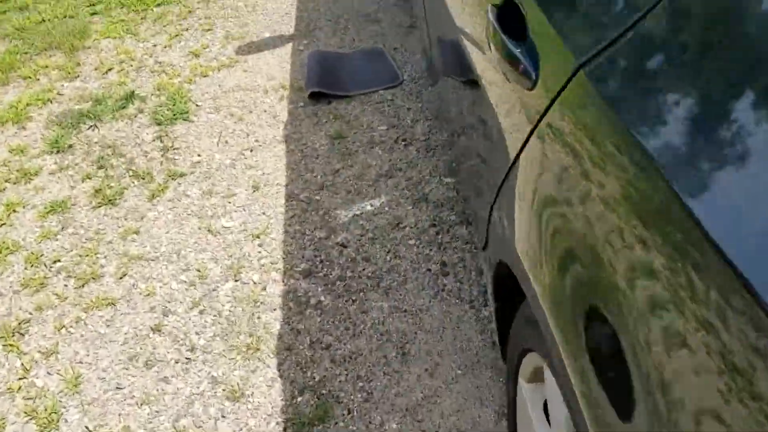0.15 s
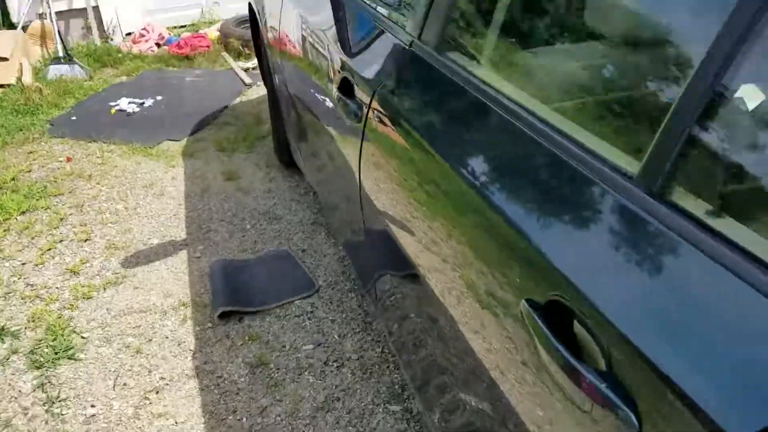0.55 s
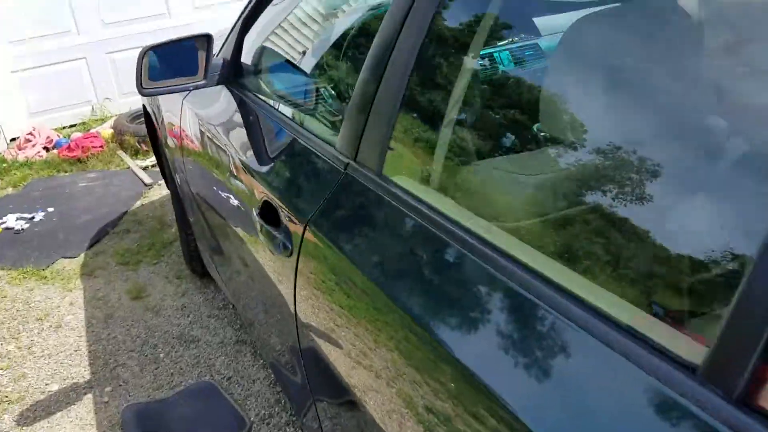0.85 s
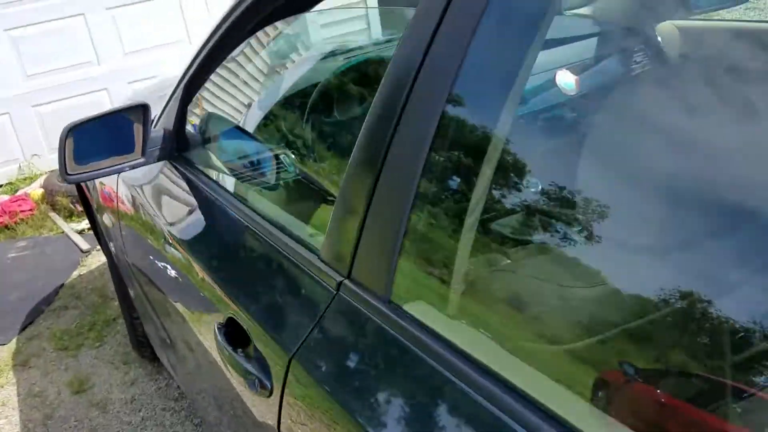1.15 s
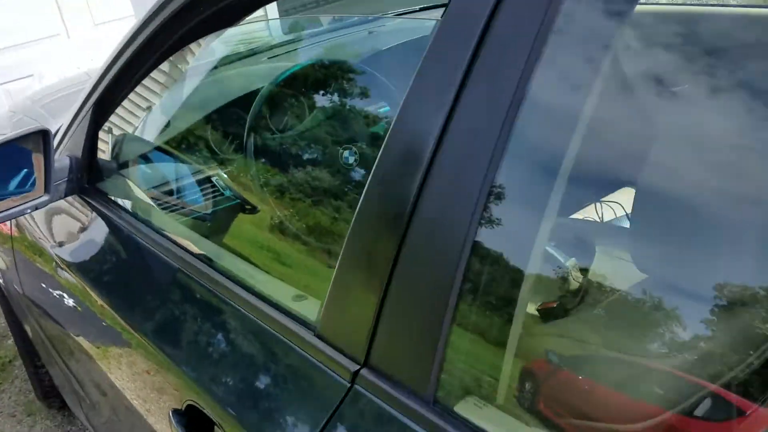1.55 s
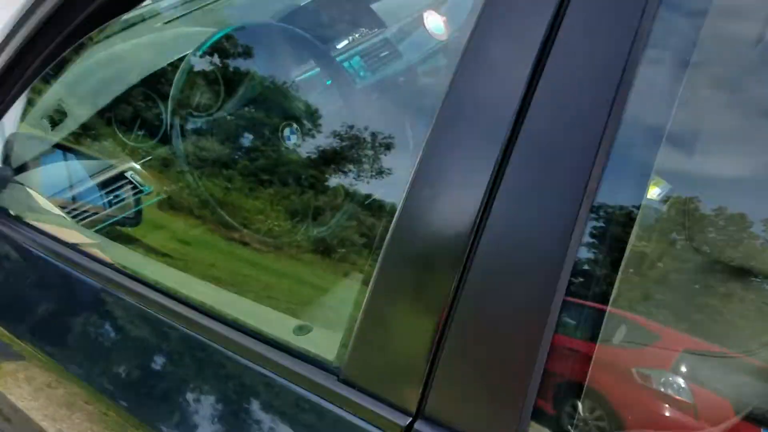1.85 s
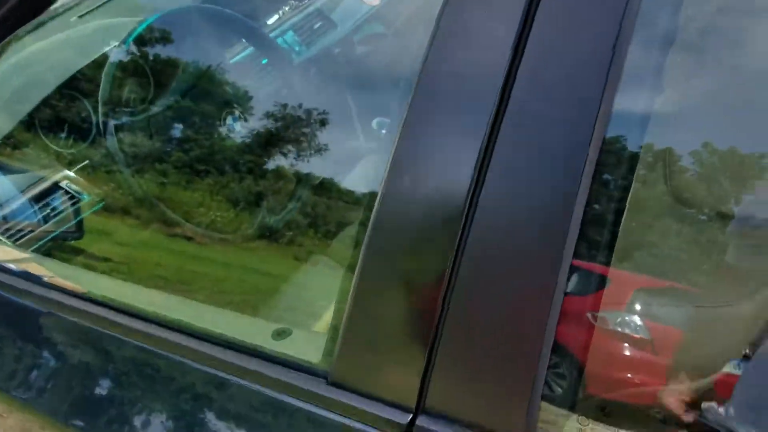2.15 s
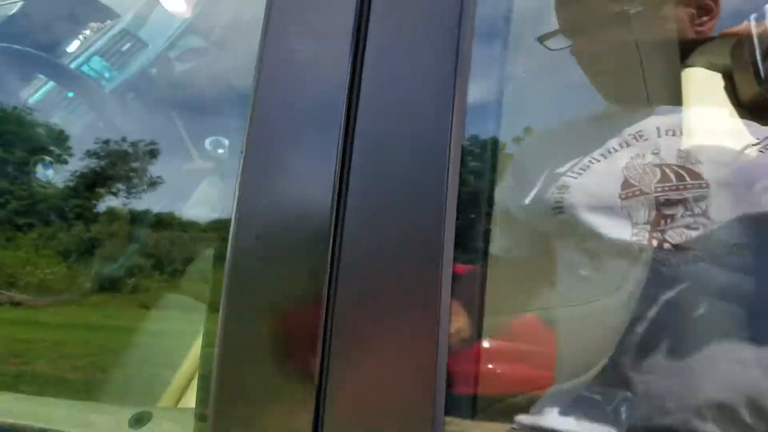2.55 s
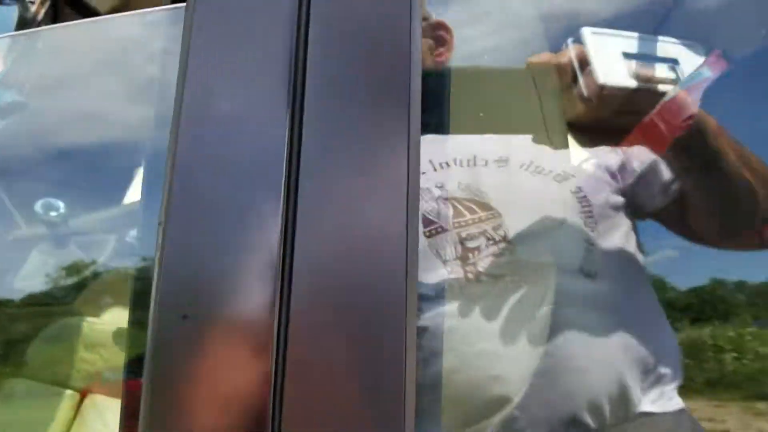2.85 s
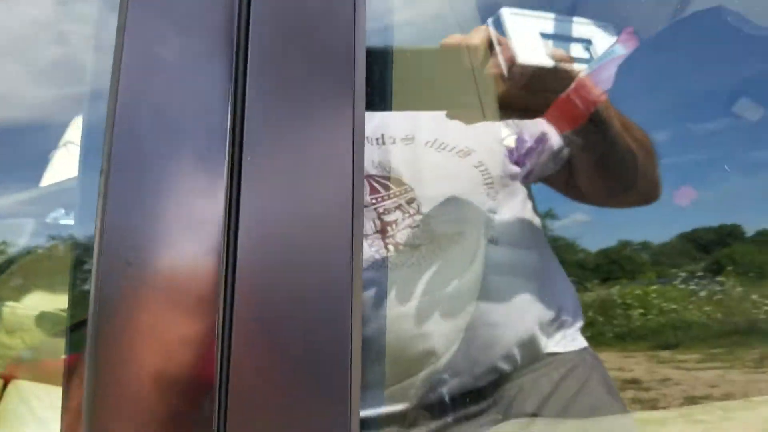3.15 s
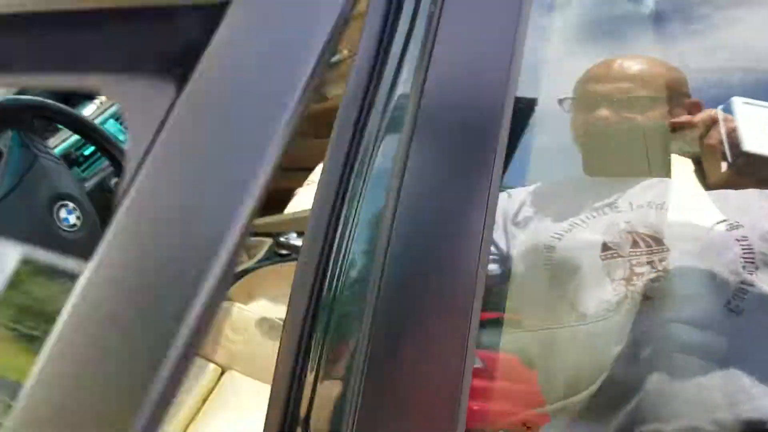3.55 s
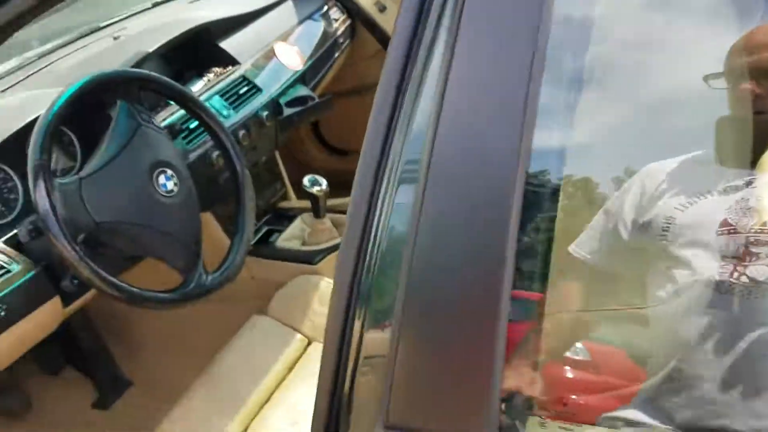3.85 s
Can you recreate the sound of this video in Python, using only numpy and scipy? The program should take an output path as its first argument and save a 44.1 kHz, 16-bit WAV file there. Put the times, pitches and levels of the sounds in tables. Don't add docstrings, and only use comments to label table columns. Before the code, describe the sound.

Shuffling footsteps crunch on loose gravel, close to a stereo handheld microphone; keys tick and jingle through the middle, while an insect trills softly and a distant engine fades early, outdoors beside a parked car.

```python
import sys
import numpy as np
from scipy import signal
from scipy.fft import rfft, irfft
from scipy.io import wavfile

SR = 44100
rng = np.random.default_rng(int(sys.argv[2]) if len(sys.argv) > 2 else 0)


def store_wav(level_fs):
    pcm = np.round(np.clip(np.atleast_2d(level_fs), -1, 1) * 32767)
    wavfile.write(sys.argv[1], SR, pcm.T.astype(np.int16))


def ratio(d):
    e = np.asarray(d, float) / 20
    return 10 ** e


N = 176400


def unit(x):
    return x / np.sqrt(np.mean(x ** 2) + 1e-20)


def at_hz(points, hz):
    points = np.array(points)
    return np.interp(np.log(hz), np.log(points[:, 0]), points[:, 1])


def shaped(x, gain):
    hz = np.maximum(np.fft.rfftfreq(N, 1 / SR), 1)
    return irfft(rfft(x) * gain(hz), N)


def drift(rate_hz):
    hop = 40
    r = np.exp(-2 * np.pi * hop * rate_hz / SR)
    slow = signal.lfilter([1], [1, -2 * r, r * r], rng.standard_normal(N // hop + 2002))[2000:]
    return np.interp(np.arange(N) / hop, np.arange(len(slow)), unit(slow))


def ring(clicks, hz, t60):
    r = ratio(-60 / (t60 * SR))
    w = 2 * np.pi * min(hz, .45 * SR) / SR
    return signal.lfilter([0, np.sin(w)], [1, -2 * r * np.cos(w), r * r], clicks + 1e-18)


def pair(x, place):
    lag, lag_spread = 5.3, 6.54
    left = np.roll(x, int(lag + lag_spread * place))
    return np.array([left, x]) * ratio([[2.0 * place], [0]])


def add(out, s, x):
    i = int(s * SR)
    out[:, i:i + x.shape[1]] += x[:, :N - i]


def bright(hz):
    # f/Hz, level/dB
    treble_colour = [(2500, -3), (4800, -14.5), (6200, -4.5), (7400, -13.5), (8700, 2.5), (10800, -6.5),
                     (13400, -5), (15500, -9)]
    return ratio(at_hz(treble_colour, hz)) * (hz > 2200)


def air():
    # f/Hz, level/dB
    air_spectrum = [(100, -4.5), (353, 2), (884, -9), (2300, -4), (3100, -13), (4800, -17), (7200, -13),
                    (16000, -24)]
    air_db, patchy_db, alike_below_hz = -49, 3, 710
    edges = [0, 700, 2800, 5000, 7500, 11000, SR]

    def floor_gain(hz):
        return ratio(at_hz(air_spectrum, hz)) * (hz > 90)

    def coherence(hz):
        return 1 / (1 + (hz / alike_below_hz) ** 2)

    mid, side = rng.standard_normal((2, N))
    mid = shaped(mid, lambda hz: floor_gain(hz) * np.sqrt(1 + coherence(hz)))
    side = shaped(side, lambda hz: floor_gain(hz) * np.sqrt(1 - coherence(hz)))
    both = unit(np.array([mid + side, mid - side]))
    shared = drift(3)
    out = np.zeros((2, N))
    for low, high in zip(edges, edges[1:]):
        swell = ratio(patchy_db * (.7 * shared + .7 * drift(14)))
        out += swell * shaped(both, lambda hz: (hz > low) & (hz <= high))
    return ratio(air_db) * out


def wind():
    # middle t/s, width/s, level/dB
    gusts = [
        (.2, 0.83, -45),
        (.6, 0.048, -49),
        (3.2, 0.084, -46),
    ]
    calm_db, wind_hz = -67, (41.6, 130)
    t = np.arange(N) / SR
    both, own = rng.standard_normal(N), rng.standard_normal((2, N))
    band = signal.butter(2, wind_hz, "band", fs=SR, output="sos")
    turbulence = unit(signal.sosfilt(band, both + 0.96 * own))
    blow = ratio(calm_db)
    for s, width, db in gusts:
        blow = blow + ratio(db) * np.exp(-.5 * ((t - s) / width) ** 2)
    return blow * ratio(1.5 * drift(15)) * turbulence


def engine():
    # f/Hz, width/Hz, level/dB
    engine_lines = [
        (113.5, 6, 0),
        (159, 5, -4),
        (200, 8, -9),
    ]
    engine_db, stop_s, rest_db = -44, 0.7, -15.5
    t = np.arange(N) / SR

    def lines(hz):
        return sum(ratio(db) / (1 + (2 * (hz - f) / width) ** 2) for f, width, db in engine_lines)

    fade_db = rest_db / (1 + np.exp((stop_s - t) / 0.08))
    return ratio(engine_db + fade_db) * unit(shaped(rng.standard_normal(N), lines))


def insect_throb():
    centre_hz, width_hz, throbs_per_s = 8250, 600, 18
    level_db, depth_db = -61, 5
    throb = np.sin(2 * np.pi * np.cumsum(throbs_per_s * (1 + 0.28 * drift(4.37))) / SR)
    band = shaped(rng.standard_normal((2, N)), lambda hz: 1 / (1 + (2 * (hz - centre_hz) / width_hz) ** 2))
    return ratio(level_db + depth_db * throb + 2 * drift(8.6)) * unit(band)


def insect_trill():
    # start t/s, end t/s, level/dB
    bouts = [
        (.004, .2, -47),
        (.23, 2.7, -54),
        (2.72, 3.0, -49),
        (3.095, 3.13, -47),
        (3.2, 3.97, -55),
    ]
    note_s, every_s, centre_hz, fall_hz = .022, .0565, 8250, 350
    n = int(note_s * SR)
    turns = np.cumsum(centre_hz + fall_hz * np.linspace(.3, -.7, n)) / SR
    note = np.sqrt(np.hanning(n)) * np.sin(2 * np.pi * turns)
    out = np.zeros((2, N))
    for start, end, db in bouts:
        for s in np.arange(start, end, every_s):
            add(out, s, pair(ratio(db + rng.normal(0, 1.5)) * note, 0))
    return out


def bird():
    # t/s, length/s, from f/Hz, to f/Hz, level/dB
    chirps = [
        (2.74, .025, 4100, 3300, -45),
        (3.355, .045, 4500, 3700, -46),
        (3.475, .047, 4050, 2800, -48),
        (3.698, .04, 3900, 3000, -45),
        (3.813, .047, 4250, 2600, -46),
    ]
    out = np.zeros((2, N))
    for s, length, from_hz, to_hz, db in chirps:
        n = int(length * SR)
        turns = np.cumsum(np.linspace(from_hz, to_hz, n)) / SR
        whistle = np.sqrt(np.hanning(n)) * np.sin(2 * np.pi * turns)
        add(out, s, pair(ratio(db) * whistle, 0))
    return out


def key_ticks():
    # t/s, peak level/dB
    ticks = [(0.2588, -17), (0.9073, -7), (1.2271, -28), (1.2994, -13.5), (1.3633, -17.5), (1.479, -19),
             (1.5549, -17), (1.6756, -25), (1.7754, -20.5), (1.8342, -21.5), (1.933, -20), (2.0991, -15.5),
             (2.1345, -21.5), (2.2523, -15.5), (2.3286, -18), (2.3565, -15.5), (2.4724, -21), (2.4897, -13),
             (2.5045, -12.5), (2.5396, -11), (2.6454, -16), (2.66, -18), (2.668, -8), (2.8604, -26),
             (3.015, -15)]
    t60_s, level_db = .022, -5
    mode_db, mode_t60_s = -10, .02
    out, t = np.zeros((2, N)), np.arange(4000) / SR
    noise = unit(shaped(rng.standard_normal(N), lambda hz: bright(hz) * hz ** 0.78))
    for (s, db), u in zip(ticks, rng.random((40, 4))):
        i = int(min(s, 3.8) * SR)
        burst = noise[i:i + 4000] * ratio(-60 * t / t60_s)
        modes_hz = 7000 + 8500 * u[:3]
        modes = np.sin(2 * np.pi * np.outer(modes_hz, t)).sum(axis=0)
        x = burst + ratio(mode_db - 60 * t / mode_t60_s) * modes
        onset = 1 - np.exp(-t / 0.00062)
        add(out, s - .001, ratio(db + level_db) * pair(x * onset, 2 * u[3] - 1))
    return out


def free_keys():
    # t/s, f/Hz, level/dB, t60/s
    singing = [
        (1.322, 10300, -20, .05),
        (2.025, 8300, -22, .06),
        (2.385, 8772, -28, .4),
        (2.40, 7335, -30, .2),
        (2.405, 7479, -33, .2),
        (2.395, 12683, -26, .16),
        (2.52, 12683, -31, .1),
        (2.545, 14641, -26, .15),
        (2.575, 12941, -27, .12),
    ]
    swell_s = .012
    out, t = np.zeros((2, N)), np.arange(12000) / SR
    waver = ratio(3.5 * drift(60))
    for s, hz, db, t60 in singing:
        envelope = ratio(db - 60 * t / t60) * (1 - np.exp(-t / swell_s))
        x = envelope * np.sin(2 * np.pi * hz * t) * waver[int(hz):][:12000]
        add(out, s, np.array([x, np.roll(x, 1)]))
    return out


def snaps():
    # t/s, peak level/dB, f/Hz
    clacks = [(0.0731, -39, 8000), (0.085, -20, 6300), (0.2163, -23, 6200), (0.9198, -8, 9250),
              (1.0366, -34, 8160), (1.1766, -24, 8400), (1.4136, -18, 8850), (1.5336, -23, 8900),
              (1.7633, -22, 10900), (1.796, -21, 8510), (1.9733, -12, 12000), (2.31, -27, 8400),
              (2.9715, -33, 8660), (3.0913, -28, 8200), (3.602, -23, 8600), (3.632, -19, 6980),
              (3.7649, -19.5, 7050), (3.7883, -28, 8410), (3.9398, -45, 8800), (3.9564, -27, 6300)]
    t60_s, mode_t60_s, mode_db, level_db = .012, .012, -6, -2
    out, t = np.zeros((2, N)), np.arange(2000) / SR
    stray = [(4 * a, -45 + 10 * b, 4000 + 10000 * c) for a, b, c in rng.random((45, 3))]
    for (s, db, hz), place in zip(list(clacks) + stray, rng.uniform(-0.87, 1, 90)):
        bassless = signal.lfilter([1, 0, -1], [1], rng.standard_normal(len(t)))
        burst = bassless * ratio(-60 * t / t60_s) / 2
        x = burst + ratio(mode_db - 60 * t / mode_t60_s) * np.sin(2 * np.pi * hz * t)
        add(out, s - .0005, ratio(db + level_db) * pair(x / abs(x).max(), place))
    return out


def knocks():
    # t/s, peak level/dB, f/Hz
    stones = [(0.07, -20.5, 1470), (0.226, -12, 1500), (0.253, -16.5, 341), (0.341, -16, 2260),
              (0.593, -21.5, 1540), (0.625, -26, 1490), (0.948, -17, 1600), (0.979, -22, 1020),
              (1.037, -28, 945), (1.292, -16.5, 620), (1.398, -13, 1130), (1.625, -15, 1270),
              (1.987, -16.5, 470), (2.116, -15.5, 624), (2.148, -21, 500), (2.17, -4.5, 597),
              (2.393, -20.5, 430), (2.553, -17, 600), (2.763, -24.5, 660), (2.987, -20.5, 2400),
              (3.074, -23.5, 470), (3.249, -16, 1740), (3.53, -19.5, 1570), (3.811, -19, 2300),
              (3.916, -28.5, 320)]
    # t/s, peak level/dB, f/Hz
    further_stones = [(0.131, -24.5, 1020), (0.179, -22, 1310), (0.277, -15.5, 990), (0.407, -25.5, 1297),
                      (0.429, -25.5, 1260), (0.749, -27, 1960), (0.884, -23, 774), (1.151, -39, 1110),
                      (1.28, -26, 612), (1.307, -26, 515), (1.555, -18, 1410), (1.715, -24.5, 1780),
                      (1.848, -18.5, 1920), (1.975, -27, 666), (2.24, -26.5, 630), (2.458, -19, 1360),
                      (2.806, -35, 513), (2.909, -30, 2050), (3.198, -16, 1770), (3.22, -13, 1540),
                      (3.26, -19.5, 580), (3.355, -23.5, 1490), (3.407, -24, 1500), (3.579, -30.5, 533),
                      (3.765, -28, 1300), (3.992, -27.5, 2270)]
    cycles, upper_ratio, upper_db, level_db = 5.05, 2.77, -10, -0.5
    out = np.zeros((2, N))
    for (s, db, hz), place in zip(list(stones) + list(further_stones), rng.uniform(-1.4, 1, 60)):
        force = np.pad(np.hanning(int(SR / hz / 3.1) + 3), (0, 2000))
        n = len(force)
        force = force * (1 + .3 * rng.standard_normal(n))
        force = force + .25 * rng.standard_normal(n) * np.exp(-np.arange(n) / 130)
        lower = ring(force, hz, cycles / hz)
        force_slope = np.diff(force, prepend=0) * SR / hz / 25.0
        upper = ring(force_slope, hz * upper_ratio, 3.44 * cycles / hz / upper_ratio)
        low_cut = signal.butter(2, 0.92 * hz, "high", fs=SR, output="sos")
        x = signal.sosfilt(low_cut, lower + ratio(upper_db) * upper)
        add(out, s + 0.001897, ratio(db + level_db) * pair(x / abs(x).max(), place))
    return out


def heels():
    # t/s, f/Hz, level/dB
    thumps = [
        (.535, 130, -23.5),
        (2.83, 299, -27),
        (3.162, 358.6, -14),
        (3.602, 326.5, -18.5),
    ]
    t60_s, sag = .14, .55
    out, t = np.zeros((2, N)), np.arange(8000) / SR
    for s, hz, db in thumps:
        sagging = hz * (1 - sag * np.minimum(t / t60_s * 2, 1))
        turns = np.cumsum(sagging * ratio(2.71 * drift(59)[:8000])) / SR
        envelope = ratio(db - 60 * t / t60_s) * (1 - np.exp(-t / 0.0034))
        add(out, s, pair(envelope * np.sin(2 * np.pi * turns), 0))
    return out


def pressure(rows):
    rise_s, fall_s = 0.0098, 0.026
    t, power = np.arange(N) / SR, np.zeros(N)
    for s, length, db in rows:
        rise = np.clip((t - s) / rise_s, 0, 1)
        fall = np.exp(-np.maximum(t - s - length, 0) / fall_s)
        power += ratio(2 * db) * (rise * fall) ** 2
    return np.sqrt(power)


def grains(span_hz, per_s, cycles, uneven_db, clump_db, tilt_db, count=10):
    sizes = ratio(uneven_db * np.minimum(rng.exponential(1, N), 3.5)) * rng.choice([-1, 1], N)
    hits = sizes * (rng.random(N) < per_s / SR)
    dealt = rng.integers(0, count, N)
    places = np.sin(2.4 * np.arange(count))
    out = np.zeros((2, N))
    for k, hz in enumerate(np.geomspace(*span_hz, count)):
        mine = (dealt + k) % count < 3
        rung = unit(ring(hits * mine, hz, cycles / hz))
        out += pair(ratio(tilt_db * k / count) * rung, places[k])
    limits = [span_hz[0], min(1.78 * span_hz[1], .45 * SR)]
    band = signal.butter(3, limits, "band", fs=SR, output="sos")
    return unit(signal.sosfilt(band, out) * ratio(clump_db * drift(56)))


def gravel():
    # t/s, length/s, thud level/dB, grit level/dB, sand level/dB
    footfalls = np.array([(0.043, 0.35, -62, -44, -48.5), (0.213, 0.06, -40, -31, -34),
                          (0.293, 0.043, -46, -36.5, -39.5), (0.767, .21, -47, -43, -61),
                          (0.898, 0.033, -48.5, -65, -33.5), (1.154, 0.17, -78, -48.5, -42),
                          (1.217, 0.069, -34.5, -36, -42), (1.343, 0.16, -51, -44.5, -39.5),
                          (1.542, 0.033, -38.5, -37.5, -35.5), (1.592, 0.11, -44.5, -38, -43.5),
                          (1.824, 0.012, -81, -42.5, -35.5), (1.955, 0.052, -33.5, -33.5, -37.5),
                          (2.093, 0.17, -45, -43, -38), (2.38, 0.12, -39.5, -45, -38.5),
                          (2.469, 0.14, -51.5, -40.5, -32.5), (2.819, 0.0054, -40, -55, -64),
                          (3.007, 0.011, -26, -35, -34), (3.129, 0.06, -35, -31, -41),
                          (3.158, 0.034, -29, -28.5, -37.5), (3.206, 0.013, -44, -32.5, -48),
                          (3.236, 0.028, -33, -39.5, -50), (3.334, 0.13, -49, -44.5, -54),
                          (3.585, 0.031, -31, -35, -39), (3.681, 0.12, -49, -51, -46)])
    # t/s, length/s, level/dB
    rustles = [
        (.815, 0.016, -37),
        (1.272, 0.021, -30.5),
        (1.76, 0.3, -47),
        (2.545, 0.028, -29),
        (2.68, 0.014, -45.5),
        (2.81, .1, -59),
    ]
    thud_hz, grit_hz, sand_hz, settle_hz = (320, 900), (1150, 2500), (3000, 15500), (700, 2600)
    settle_db, top_split_hz = -54, 10000
    loose_from_s, loose_to_s, top_loose_db, top_held_db = .85, 2.73, 1.5, -8

    t = np.arange(N) / SR
    fine = unit(shaped(grains(sand_hz, 4000, 22.0, 3.5, 3.5, 3, count=14), bright))
    top = shaped(fine, lambda hz: 1 / (1 + (top_split_hz / hz) ** 12))
    loose = (t > loose_from_s) & (t < loose_to_s)
    top_db = np.where(loose, top_loose_db, top_held_db) + 3 * drift(12)
    fine = (fine - top) * ratio(2 * drift(8)) + top * ratio(top_db)

    thud = pressure(footfalls[:, [0, 1, 2]]) * grains(thud_hz, 600, 9.2, 2.1, 3.64, 0.57)
    grit = pressure(footfalls[:, [0, 1, 3]]) * grains(grit_hz, 800, 15.0, 3.0, 3.0, -1.0)
    sand = np.hypot(pressure(footfalls[:, [0, 1, 4]]), pressure(rustles)) * fine
    settling = ratio(settle_db) * grains(settle_hz, 300, 8.0, 3.5, 4.0, -1.0)
    return thud + grit + sand + settling


def scene():
    echo_s, echo_db = .0075, -18.5
    near = key_ticks() + free_keys() + snaps() + knocks() + heels() + gravel()
    delayed = np.roll(near[::-1], int(echo_s * SR), axis=1)
    echo = signal.lfilter([.4], [1, -.6], delayed)
    far = air() + wind() + engine() + insect_throb() + insect_trill() + bird()
    return near + ratio(echo_db) * echo + far


def roll_off(x):
    return signal.sosfilt(signal.butter(12, 16960, fs=SR, output="sos"), x)


def record(dry):
    # f/Hz, left over right level/dB
    port_colour = [(60, -1), (180, -1.5), (550, 1), (1650, -5.5), (4970, -6), (15000, 0.5)]
    # f/Hz, left lead/rad
    port_phase = [(60, -.3), (200, 0.091), (600, -0.29), (1400, -0.36), (3000, -0.12)]
    top_hz = 15980

    def response(hz, sign):
        db = sign * at_hz(port_colour, hz) / 2 - 60 * (hz > top_hz)
        return ratio(db) * np.exp(.5j * sign * at_hz(port_phase, hz))

    left = shaped(dry[0], lambda hz: response(hz, 1))
    right = shaped(dry[1], lambda hz: response(hz, -1))
    return roll_off(np.array([left, right]))


dry = scene()
out = record(dry)
store_wav(out)
```